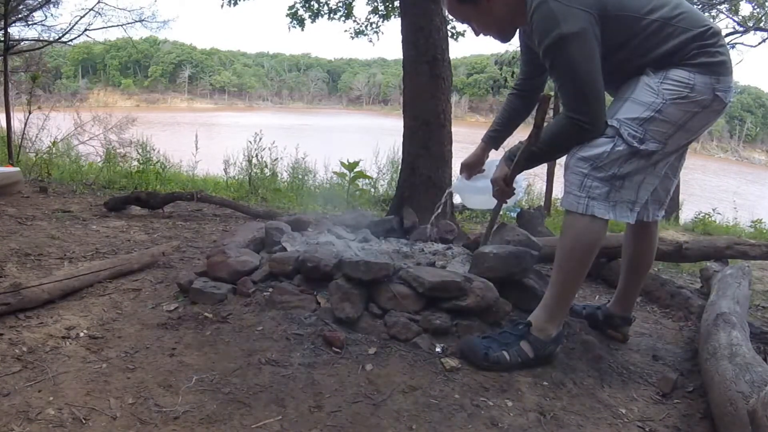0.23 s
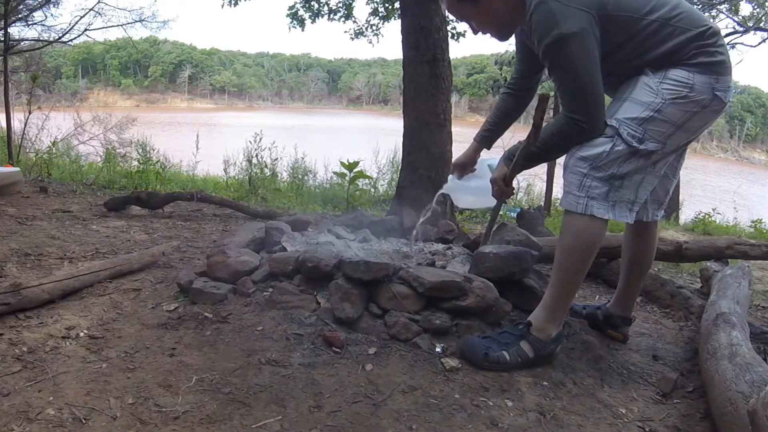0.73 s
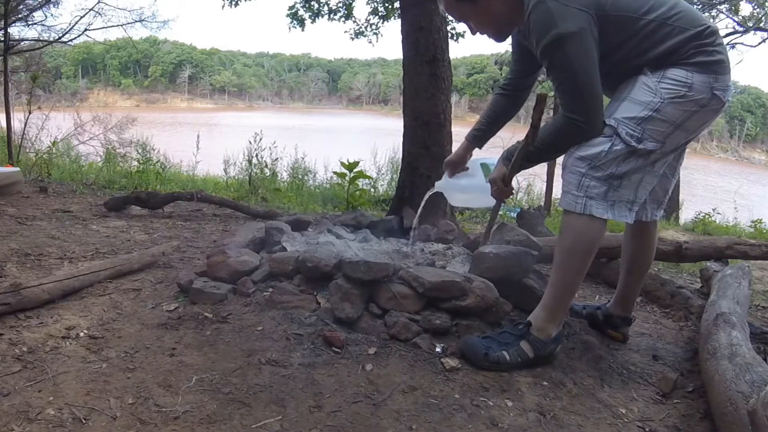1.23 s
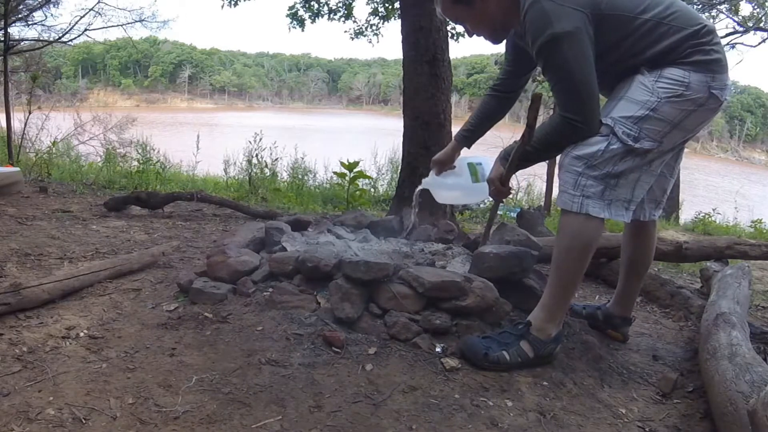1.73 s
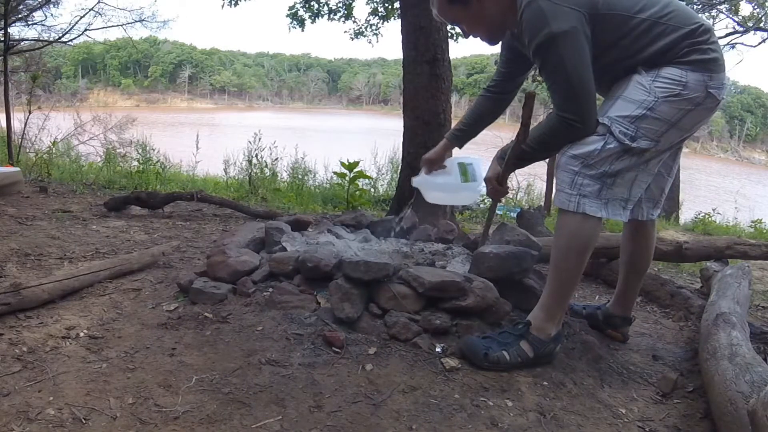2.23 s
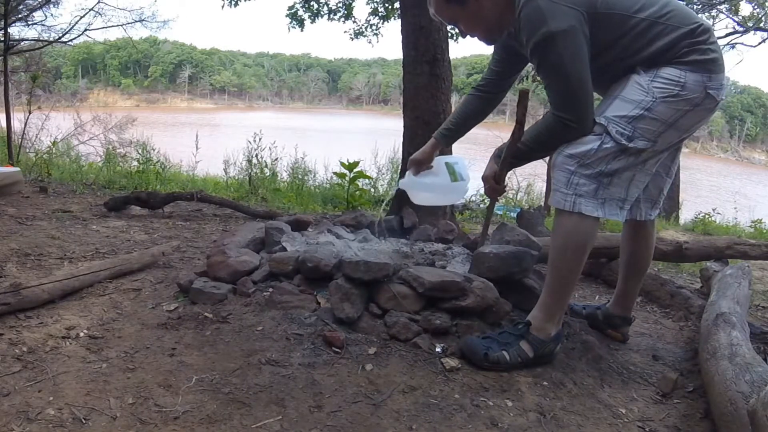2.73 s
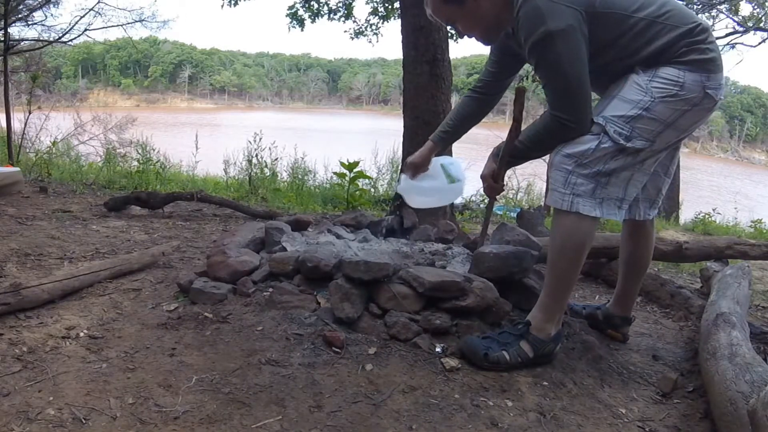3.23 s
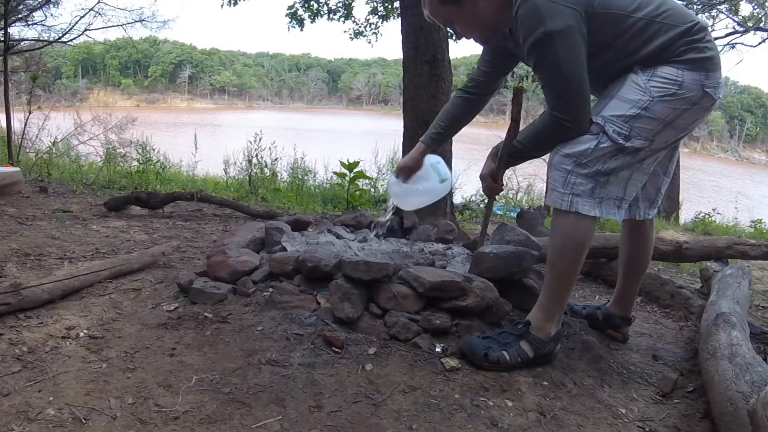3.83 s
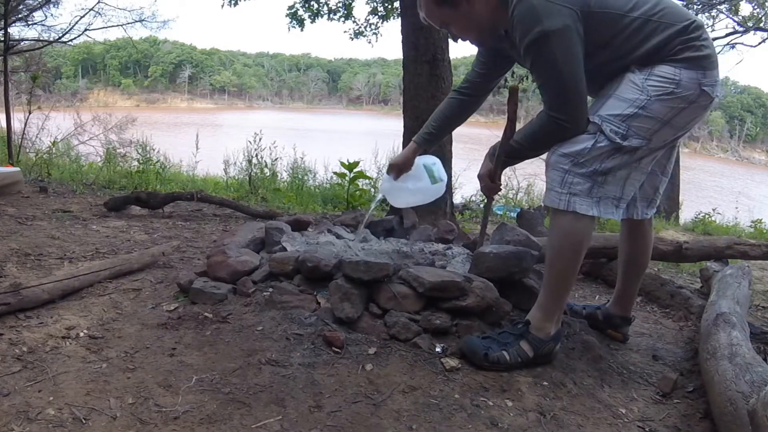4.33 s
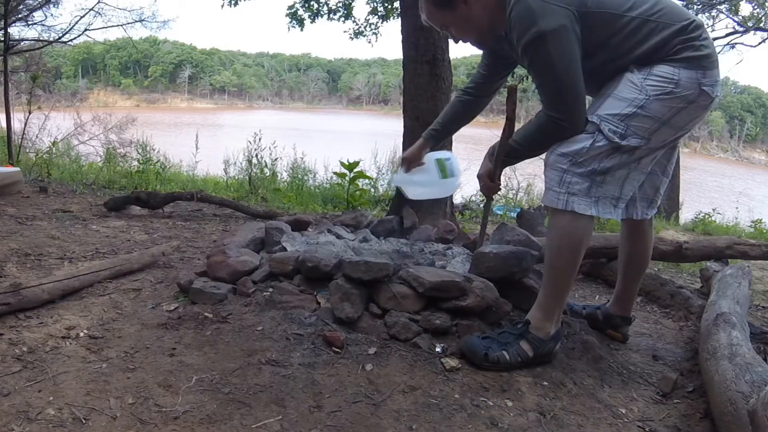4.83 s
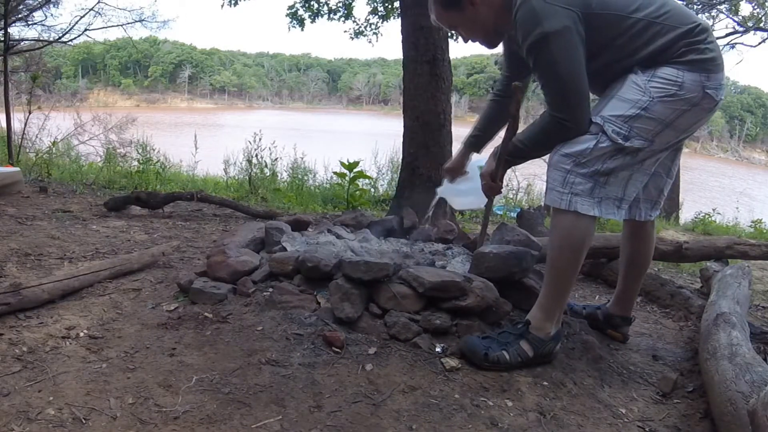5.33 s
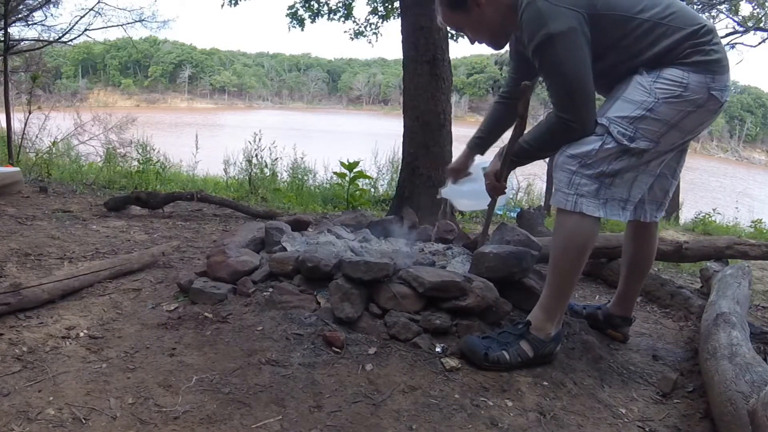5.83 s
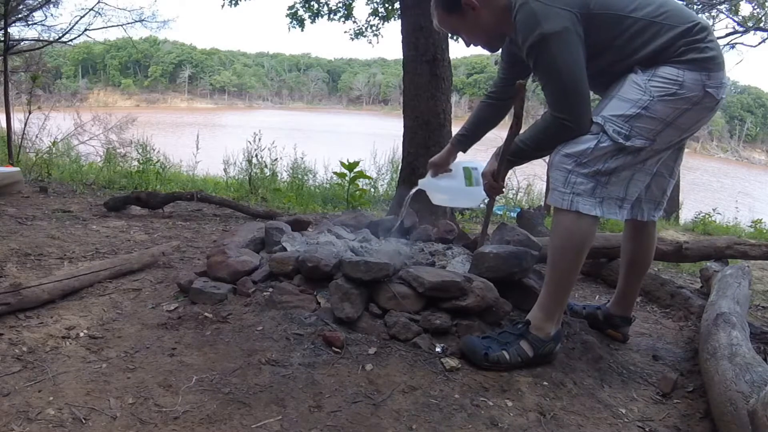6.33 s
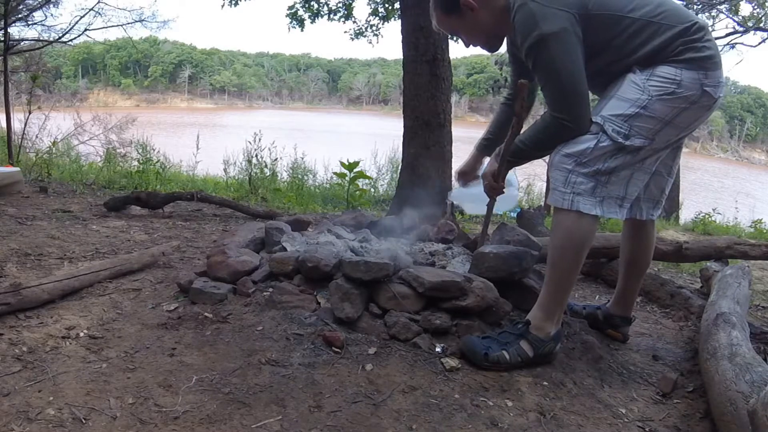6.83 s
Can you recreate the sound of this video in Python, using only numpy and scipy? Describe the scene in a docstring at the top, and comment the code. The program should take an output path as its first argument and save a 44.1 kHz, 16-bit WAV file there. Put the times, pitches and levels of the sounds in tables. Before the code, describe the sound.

Hot coals hiss and tick under water splashing from a glugging jug, with low wind rumble, birdsong and a faint insect trill.

```python
"""Wind rumbles on the microphone at a lakeside campfire. From the start, water poured from a jug
patters into the ash and boils on the coals: steam hisses and sizzles, and the cooling coals tick.
An insect trills with its wings, and a bird whistles a first phrase over faint, far twitter.
The jug glugs once, and the strongest gust passes. During the bird's second phrase the jug knocks;
last comes a run of glugs, with slugs of water slapping the ash and gurgling among the coals."""
import sys
import numpy as np
from scipy import signal
from scipy.fft import rfft, irfft, next_fast_len
from scipy.io import wavfile

SR = 44100
rng = np.random.default_rng(int(sys.argv[2]) if len(sys.argv) > 2 else 0)


def store_pcm(level_fs):
    """Save levels as 16-bit WAV."""
    pcm = np.round(np.clip(level_fs, -1, 1) * 32767).astype(np.int16)
    wavfile.write(sys.argv[1], SR, np.atleast_2d(pcm).T)


N = 312669
TIME = np.arange(N) / SR

# Tips of the jug. Each row: start and length in seconds, then splash, boil and steam levels in dB.
POURS = [(-.05, 0.69, -79, -75, -75.5), (0.659, 0.87, -66, -85, -74), (1.788, 0.43, -90, -66, -94),
         (2.877, 2.1, -67.5, -92, -92), (4.864, 0.18, -66.5, -68.5, -84), (5.133, 0.054, -63, -66.5, -88),
         (5.23, 0.4, -63.5, -60, -82), (5.7, 0.38, -66, -67.5, -90), (6.17, 0.25, -60, -60.5, -82),
         (6.486, 0.032, -72, -57.5, -86), (6.725, 0.24, -82, -65, -79)]
# Glugs of the jug. Each row: centre in seconds, hollow, splash and boil levels in dB,
# brightness in dB per octave, gulp pitch in Hz.
GLUGS = [(1.54, -68, -60.5, -88, -3, 354), (5.34, -65, -58, -70, -0.5, 340),
         (5.459, -54, -55.5, -71, -3, 348), (6.225, -74, -73, -78, 11.5, 344),
         (6.281, -53.5, -62, -59, 0, 430), (6.41, -57, -60, -76, -8, 322),
         (6.71, -58.5, -78, -82, 1.5, 356), (6.86, -54.5, -82, -80, -2, 414),
         (6.955, -56, -64, -72, 1.5, 347)]
# Four birdsong motifs. Each row: a note's offset and length in seconds, start and end pitch in Hz.
TWITTER = [(.008, 0.043, 2930, 3030), (0.05, 0.043, 2350, 2080), (0.136, .036, 2750, 2860),
           (.177, 0.037, 3180, 3210), (0.218, 0.034, 3470, 3430), (0.255, 0.024, 2550, 2520)]
TWO_TONE = [(0, 0.081, 2680, 2810), (.075, 0.072, 2350, 2310)]
WARBLE = [(0.005, 0.066, 1970, 2200), (.074, 0.028, 2520, 2450), (.095, 0.0277, 2180, 1700),
          (.119, 0.032, 2290, 2284), (0.171, 0.0205, 3270, 2740), (.205, .026, 2636, 2710),
          (0.239, 0.0333, 2695, 2890), (.286, .055, 2310, 2295)]
LAST_NOTES = [(0, 0.031, 2350, 2360), (.03, .028, 2190, 1850)]


def gain_of(db):
    """Amplitude grows tenfold for every 20 dB."""
    return 10 ** (np.asarray(db) / 20)


def evened(x):
    """Normalisation brings a signal to rms 1."""
    return x / np.sqrt(np.mean(x ** 2) + 1e-20)


def together(gains):
    """Incoherent sounds add in power."""
    return np.sqrt(sum(gain ** 2 for gain in gains))


def add(mix, start, sound):
    """Superposition: a sound adds to the mix from its start in seconds."""
    part = mix[max(round(start * SR), 0):][:len(sound)]
    part += sound[:len(part)]


def colour(x, spectrum):
    """Spectral shaping by rows of frequency in Hz and relative level in dB, to rms 1."""
    hz, db = np.transpose(spectrum)
    size = next_fast_len(len(x), True)
    bins_hz = np.fft.rfftfreq(size, 1 / SR)
    response = gain_of(np.interp(np.log(bins_hz + 1), np.log(hz + 1), db))
    return evened(irfft(rfft(x, size) * response, size)[:len(x)])


def band(x, lo_hz, hi_hz):
    """A causal band-pass filter acts as a resonance."""
    edges_hz = np.clip([lo_hz, max(hi_hz, lo_hz + 20)], 20, SR / 2 - 100)
    return signal.sosfilt(signal.butter(2, edges_hz, btype="band", fs=SR, output="sos"), x)


def drift(rate_hz):
    """Low-passed noise gives a smooth random fluctuation of rms 1."""
    size = next_fast_len(N, True)
    response = np.exp(-(np.fft.rfftfreq(size, 1 / SR) / rate_hz) ** 2)
    return evened(irfft(rfft(rng.standard_normal(size)) * response, size)[:N])


def pops(per_s, spread_db):
    """Shot noise: impulses of random time, sign and size, at rms 1."""
    size = gain_of(spread_db * np.minimum(rng.exponential(1, N), 4))
    return evened(size * rng.choice([-1, 1], N) * (rng.random(N) < per_s / SR))


def steadied(x):
    """Envelope compression holds a narrow ring at nearly even strength, at rms 1."""
    ring = signal.hilbert(evened(x), next_fast_len(len(x)))[:len(x)]
    return evened(ring.real / np.sqrt(abs(ring) ** 2 + .5))


def held(start, length, release_s, attack_s=.014):
    """An envelope of linear rise, hold and exponential decay."""
    rise = np.clip((TIME - start) / attack_s, 0, 1)
    return rise * np.exp(-np.maximum(TIME - start - length, 0) / release_s)


def surge(centre, width_s=.041):
    """The flow of one glug follows a Gaussian envelope."""
    return np.exp(-.5 * ((TIME - centre) / width_s) ** 2)


def wind(breeze_db=-51, flutter_db=.5, fall_per_rise=2.04):
    """Turbulent pressure rumbles on the microphone; single eddies push and pull its diaphragm."""
    # Turbulence spectrum. Each row: frequency in Hz, relative level in dB.
    spectrum = [(10, -43), (22, 4.5), (40, -1), (85, -1.5), (125, -6.5), (150, -12.5), (175, -13),
                (205, -24), (330, -28.5), (520, -41), (920, -88)]
    # Each row: peak time in seconds, level in dB, rise time in seconds.
    gusts = [(2.42, -40, 0.74), (5.0, -48, 1), (6.35, -46.5, 0.51)]
    # Each row: centre in seconds, level in dB, pitch in Hz.
    eddies = [(1.528, -34.5, 44.5), (2.049, -32, 39.6), (2.397, -29.5, 54), (2.672, -34, 34),
              (4.39, -30.5, 41), (4.488, -33, 57.6), (4.815, -33, 40), (6.17, -33, 31.6),
              (6.558, -27.5, 51.5)]
    swells = [gain_of(db) * np.exp(-np.maximum(peak - TIME, (TIME - peak) / fall_per_rise) / rise)
              for peak, db, rise in gusts]
    rumble = colour(rng.standard_normal(N), spectrum) * gain_of(flutter_db * drift(rate_hz=3.1))
    out = together(swells + [gain_of(breeze_db)]) * evened(rumble)
    t = np.arange(-SR // 20, SR // 20) / SR
    for centre, db, hz in eddies:
        phase = 2 * np.pi * hz * t
        add(out, centre + t[0], -gain_of(db) * np.sin(phase) * np.exp(-(phase / 3.8) ** 2))
    return out


def leaves_and_lake(level_db=-60.04):
    """Distant leaves and water sum incoherently to a steady wash."""
    # Spectrum of the wash. Each row: frequency in Hz, relative level in dB.
    spectrum = [(120, -6), (200, -1), (235, -4.5), (301, -4), (454, -7), (2610, -15), (3410, -18),
                (4070, -17.5), (4610, -25.5), (5610, -19), (8930, -24), (10500, -36.5), (13000, -35),
                (14200, -48)]
    return gain_of(level_db) * colour(rng.standard_normal(N), spectrum)


def splash(flutter_db=2.5):
    """Impacts of drops on soft ash merge into shot noise, modulated by the uneven stream."""
    # Impact spectrum. Each row: frequency in Hz, relative level in dB.
    spectrum = [(150, -1), (310, 3.5), (430, -0.5), (650, 1), (900, -4.5), (1150, -5.5), (1350, -2),
                (1520, -3.5), (1780, -3.5), (2170, -6.5), (2700, -7), (5500, -14), (7000, -52),
                (12000, -58)]
    # Slugs of water landing flat. Each row: start in seconds, level in dB.
    landings = [(5.424, -55), (6.239, -61), (6.275, -47.5), (6.544, -60.5)]
    stream = [gain_of(db) * held(start, length, release_s=.17) for start, length, db, _, _ in POURS]
    slugs = [gain_of(db) * surge(centre) for centre, _, db, _, _, _ in GLUGS]
    slaps = [gain_of(db) * held(start, 0, release_s=.03, attack_s=.0022) for start, db in landings]
    drops = pops(per_s=1800, spread_db=2) + 1.08 * rng.standard_normal(N)
    patter = colour(drops, spectrum) * gain_of(flutter_db * drift(rate_hz=21))
    return together(stream + slugs + slaps) * evened(patter)


def sizzle(spurt_db=1.8, simmer_db=-71.5, simmer_from_s=2.2, release_s=.13):
    """Boiling on hot coal bursts tiny steam bubbles in spurts; the wetted coals keep simmering."""
    # Spectrum of the bursts. Each row: frequency in Hz, relative level in dB.
    spectrum = [(2500, -7.5), (3200, -5.5), (4150, -5.5), (4380, 2), (4900, 1.5), (5850, 1.5), (6300, -12),
                (8000, -15.5), (12000, -47)]
    stream = [gain_of(db) * held(start, length, release_s) for start, length, _, db, _ in POURS]
    slugs = [gain_of(db) * surge(centre) for centre, _, _, db, _, _ in GLUGS]
    simmer = gain_of(simmer_db) * held(simmer_from_s, N / SR, release_s)
    bursts = pops(per_s=700, spread_db=2) + .7 * rng.standard_normal(N)
    spurts = colour(bursts, spectrum) * gain_of(spurt_db * drift(rate_hz=24))
    return together(stream + slugs + [simmer]) * evened(spurts)


def steam(seep_db=-78):
    """Vapour seeping through the ash makes a constant flow noise that swells with the pours."""
    # Hiss spectrum. Each row: frequency in Hz, relative level in dB.
    spectrum = [(2000, -6.5), (4000, -47), (6500, 2), (8500, -3.5), (10500, -3), (13000, -18), (14300, -43)]
    plumes = [gain_of(db) * held(start, length, release_s=.22) for start, length, _, _, db in POURS]
    return together(plumes + [gain_of(seep_db)]) * colour(rng.standard_normal(N), spectrum)


def insect(stroke_hz=128, depth=.38):
    """Quick wing strokes modulate the amplitude of a close pair of narrow resonances."""
    # Wing resonances. Each row: frequency in Hz, relative level in dB.
    spectrum = [(3000, -70), (3800, -14), (3950, -12.5), (4005, 1), (4030, 3), (4058, -2), (4088, -1.5),
                (4140, -0.5), (4215, -8), (4270, -17), (4600, -16), (5200, -70)]
    # Each row: start and length in seconds, level in dB.
    trills = [(0, 0.61, -76.5), (0.648, 0.6, -73.5), (1.449, 0.16, -79), (1.68, 0.5, -73),
              (2.54, 1.516, -69), (4.876, 1.77, -69.5)]
    bouts = together(gain_of(db) * held(start, length, release_s=.062, attack_s=.01)
                     for start, length, db in trills)
    ring = steadied(colour(rng.standard_normal(N), spectrum))
    rate_hz = stroke_hz * (1 + .035 * drift(rate_hz=19))
    strokes = 1 + depth * np.sin(2 * np.pi * np.cumsum(rate_hz) / SR)
    return bouts * evened(ring * strokes)


def whistle(length, start_hz, end_hz, waver):
    """A frequency-modulated pure tone glides as it swells and fades, at rms 1."""
    size = int(length * SR)
    hz = np.linspace(start_hz, end_hz, size) * waver[:size]
    return evened(np.sin(2 * np.pi * np.cumsum(hz) / SR) * signal.windows.tukey(size, .54))


def bird(flutter_db=2.5):
    """Motifs of short whistles waver under random frequency and amplitude modulation."""
    # Each row: start in seconds, motif, level of each note in dB.
    song = [(-.125, TWITTER, [-74, -75, -89, -71, -70, -68]),
            (.228, TWITTER, [-70, -66, -73, -71.5, -64.5, -68]),
            (.592, TWITTER, [-72, -67, -63, -68, -67.5, -68]), (.705, TWO_TONE, [-69, -67.5]),
            (1.055, TWO_TONE, [-61.5, -73]), (1.422, TWO_TONE, [-68, -73]),
            (3.657, WARBLE, [-67, -66, -63, -70, -64, -56.5, -60, -74]),
            (4.015, WARBLE, [-64.5, -59, -79, -66, -62.5, -62, -59, -64.5]),
            (4.379, WARBLE, [-70, -62, -67, -67, -59, -70, -55, -64.5]), (4.82, LAST_NOTES, [-65, -71])]
    out, waver = np.zeros(N), 1 + .012 * drift(rate_hz=200)
    for start, motif, levels_db in song:
        for (offset, length, start_hz, end_hz), db in zip(motif, levels_db):
            onset = start + offset
            if onset > 0:
                add(out, onset, gain_of(db) * whistle(length, start_hz, end_hz, waver[int(onset * SR):]))
    return out * gain_of(flutter_db * drift(rate_hz=41))


def faint_cracks(per_s=11, db=-59, spread_db=4.5, hz=5020, knock_db=-15, t60=.014):
    """Faint cracks occur as a Poisson process; each yields a row for coals()."""
    draws = rng.uniform(-1.1, 1, (N // 256, 2))
    slots = np.flatnonzero(rng.random(len(draws)) < per_s * 256 / SR)
    return [(k * 256 / SR, db + spread_db * draws[k, 0], hz * (1 + .17 * draws[k, 1]), knock_db, t60)
            for k in slots]


def coals(band_ratio=1.107, crumble_db=-26, crumble_stretch=15):
    """Each crack excites a damped resonance of the cooling coal, a dull knock and a crumbling tail."""
    # The louder cracks. Each row: start in seconds, level in dB, ring pitch in Hz,
    # knock in dB relative to the ring, 60 dB decay time in seconds.
    ticks = [(.018, -49.5, 5200, -15, 0.013), (0.159, -52, 3600, -12, 0.016), (.392, -54, 5400, -11, 0.014),
             (.515, -56, 4710, 6, .017), (.709, -48, 5240, -18, .017), (0.747, -45.5, 5250, -20, 0.014),
             (.928, -50, 4560, -4, .017), (.976, -51, 5240, -14, 0.015), (.990, -52, 4840, -14, .017),
             (1.872, -53.5, 4270, 3, 0.02), (2.081, -50.5, 5060, -24, .027), (2.155, -51, 4500, -11, .02),
             (2.176, -50, 5200, -18, .017), (2.190, -44, 4300, -17, .015), (2.196, -47, 4900, -20, .017),
             (2.265, -50, 4340, -8, 0.033), (2.272, -55, 4460, -13, .03), (2.286, -47, 5550, -18, .017),
             (2.439, -46.5, 4730, -1, 0.011), (2.445, -47, 5660, -9, 0.016), (2.727, -52, 5200, -16, .017),
             (2.886, -42, 5240, -18, .012), (3.016, -44, 5500, -20, .011),
             (3.025, -34.5, 4760, -24, 0.0094), (3.223, -47, 4770, -18, .017),
             (3.458, -48.5, 5400, -19, 0.014), (3.899, -42.5, 5000, -22, .017),
             (3.966, -49, 4900, -19, .017), (4.436, -48.5, 5330, -11, .017), (4.54, -50, 2940, 8, .014),
             (4.984, -47, 5370, -18, 0.018), (5.244, -53, 5200, -12, .017), (5.262, -57, 5360, -8, 0.045),
             (5.492, -44.5, 4560, -16, 0.016), (5.602, -50, 5060, -18, 0.0093),
             (5.637, -48.5, 5650, -16, .017), (5.938, -43, 4800, -18, 0.012),
             (6.193, -48.5, 5370, -2, 0.036), (6.278, -51, 5340, -13, 0.064), (6.509, -46, 5200, -15, .017),
             (6.547, -53, 4800, 1.5, .04), (6.575, -58, 4760, -2, .017), (6.602, -52, 5170, -10, .022),
             (6.826, -50, 5640, -28, .017)]
    out, t = np.zeros(N), np.arange(SR // 10) / SR
    rise = 1 - np.exp(-(t / .001) ** 2)
    noise = rng.standard_normal((2, N + len(t)))
    for start, db, hz, knock_db, t60 in ticks + faint_cracks():
        tail = gain_of(crumble_db - 60 * t / (crumble_stretch * t60))
        fade = rise * (gain_of(-60 * t / t60) + tail)
        crack, knock = noise[:, int(start * SR):][:, :len(t)]
        resonance = steadied(band(crack, hz / band_ratio, hz * band_ratio))
        ring = band(resonance * fade, 2400, 6300)
        thud = band(band(knock * fade, 800, 3400), 800, 3400)
        size = gain_of(db) * np.sqrt(np.mean(fade ** 2))
        add(out, start, size * (evened(ring) + gain_of(knock_db) * evened(thud)))
    return out


def woods(x, t60=.83, echoes_per_s=1500):
    """Scattering from trunks returns a sound as sparse, exponentially dying echoes."""
    t = np.arange(SR) / SR
    echoes = rng.standard_normal(SR) * (rng.random(SR) < echoes_per_s / SR)
    response = echoes * (t > .012) * gain_of(-60 * t / t60)
    return signal.fftconvolve(x, response / np.linalg.norm(response))[:N]


def far_birds(notes_per_s=28, note_s=.0353, centre_hz=2546, spread_octaves=.25):
    """Far from a source the reverberant field dominates: only echoes of these random notes arrive."""
    # Bouts of twitter. Each row: start and length in seconds, level in dB.
    bouts = [(.05, 1.45, -70), (3.604, 1.23, -70)]
    notes = np.zeros(N)
    draws = rng.uniform(-1.026, 1, (N // 256, 2))
    for k in np.flatnonzero(rng.random(len(draws)) < notes_per_s * 256 / SR):
        hz = centre_hz * 2 ** (spread_octaves * draws[k, 0])
        glide = .076 * draws[k, 1]
        add(notes, k * 256 / SR, whistle(note_s, hz * (1 - glide), hz * (1 + glide), np.ones(SR)))
    level = together(gain_of(db) * held(start, length, release_s=.092, attack_s=.1)
                     for start, length, db in bouts)
    return level * evened(woods(notes))


def coal_pings(rise_s=.00018):
    """Short pitched pings and knocks, each a damped sinusoid, sound with the cracks of the coals."""
    # Each row: start in seconds, level in dB, pitch in Hz, 60 dB decay time in seconds.
    pings = [(.996, -52, 3230, 0.044), (2.155, -46, 2900, .009), (2.186, -45, 3750, .01),
             (2.279, -48, 2150, .012), (2.294, -49, 2150, .011), (2.44, -41, 2940, .008),
             (3.024, -35.5, 1700, 0.003), (4.537, -49, 2980, .014), (5.263, -44, 2700, 0.012),
             (5.602, -56, 3120, 0.028), (5.946, -39, 3390, 0.0098), (6.544, -48, 2930, .016),
             (6.575, -48, 3020, .018)]
    out, t = np.zeros(N), np.arange(SR // 10) / SR
    rise = 1 - np.exp(-t / rise_s)
    for start, db, hz, t60 in pings:
        add(out, start, gain_of(db - 60 * t / t60) * rise * np.sin(2 * np.pi * hz * t))
    return out


def jug_glugs(flutter_db=2, gulp_db=-8.5, gulp_width_hz=52):
    """Lapping water excites the jug's cavity resonances; each gulp of air has its own pitch."""
    # Cavity resonances. Each row: frequency and bandwidth in Hz, relative level in dB.
    modes = [(329, 294, -5), (655, 160, -9), (1560, 280, -15), (2130, 220, -22)]
    laps = pops(per_s=290, spread_db=-2) * gain_of(flutter_db * drift(rate_hz=28))
    out = np.zeros(N)
    for hz, width, mode_db in modes:
        octaves = np.log2(hz / modes[0][0])
        swill = together(gain_of(db + tilt * octaves) * surge(centre)
                         for centre, db, _, _, tilt, _ in GLUGS)
        out += gain_of(mode_db) * swill * evened(band(laps, hz - width / 2, hz + width / 2))
    for centre, db, _, _, _, hz in GLUGS:
        gulp = evened(band(laps, hz - gulp_width_hz / 2, hz + gulp_width_hz / 2))
        out += gain_of(db + gulp_db) * surge(centre) * gulp
    return out


def jug_knock(start_s=4.539, level_db=-50):
    """The plastic jug knocks as it is tipped back, and its modes decay freely."""
    # Each row: frequency in Hz, relative level in dB, 60 dB decay time in seconds.
    modes = [(1060, -2, .035), (1180, 0, .04), (1320, -9, .03)]
    out, t = np.zeros(N), np.arange(SR // 10) / SR
    for hz, db, t60 in modes:
        add(out, start_s, gain_of(level_db + db - 60 * t / t60) * np.sin(2 * np.pi * hz * t))
    return out


def gurgles():
    """The stream churns in pockets among the coals, whose resonances slide as the water shifts."""
    # Each row: start and length in seconds, level in dB, start pitch, end pitch and bandwidth in Hz.
    pockets = [(6.185, 0.077, -64, 1490, 1546, 110), (6.219, 0.062, -60, 2290, 2120, 280),
               (6.335, 0.104, -66, 2190, 2105, 200), (6.919, 0.059, -71, 1890, 1990, 200)]
    out, churn = np.zeros(N), rng.standard_normal(N)
    for start, length, db, start_hz, end_hz, width in pockets:
        slide_hz = np.interp(TIME, [start, start + length], [0, end_hz - start_hz])
        resonance = band(churn, start_hz - width / 2, start_hz + width / 2)
        analytic = signal.hilbert(resonance, next_fast_len(N))[:N]
        ring = evened((analytic * np.exp(2j * np.pi * np.cumsum(slide_hz) / SR)).real)
        out += gain_of(db) * held(start, length, release_s=.016, attack_s=.035) * ring
    return out


def scene(echo_db=-5):
    """The sources superpose: the fire pit close by, the birds echoing among the trees."""
    song = bird()
    water = splash() + jug_glugs() + jug_knock() + gurgles()
    fire = sizzle() + steam() + coals() + coal_pings()
    echoes = gain_of(echo_db) * woods(song * drift(rate_hz=60))
    return (water + fire + song + echoes + far_birds() + insect() + leaves_and_lake() + wind())[None]


def record(dry, cutoff_hz=14150):
    """A steep low-pass filter limits the bandwidth."""
    low_pass = signal.firwin(511, cutoff_hz, window=("kaiser", 9), fs=SR)
    return signal.oaconvolve(dry, low_pass[None], "same")


dry = scene()
out = record(dry)
store_pcm(out)
```